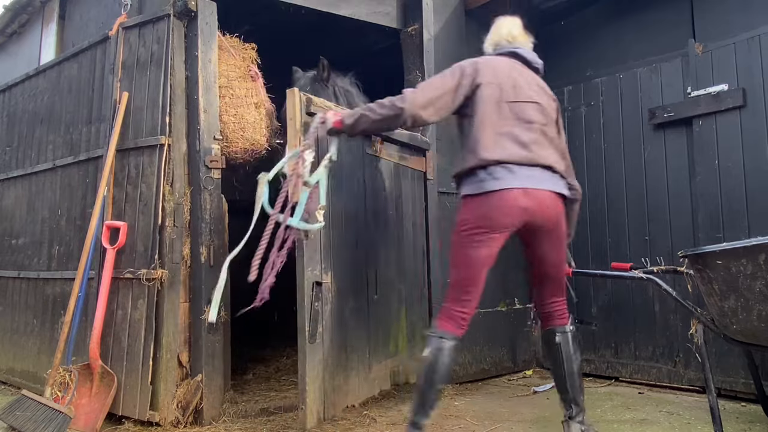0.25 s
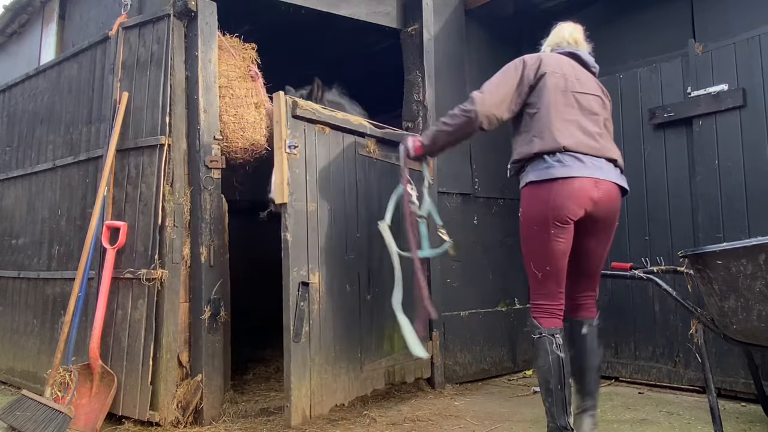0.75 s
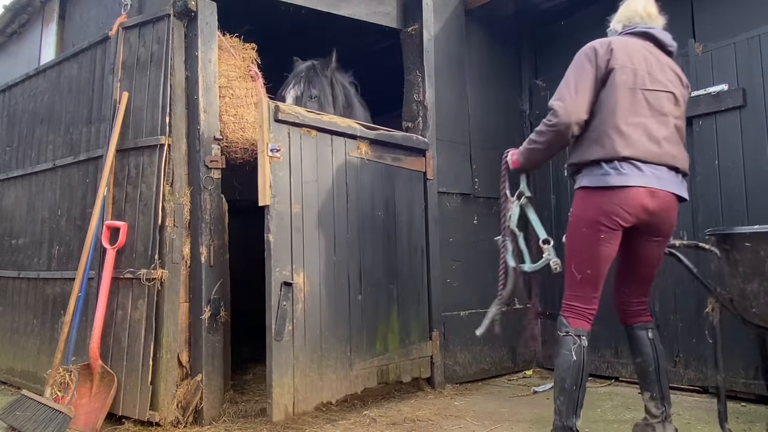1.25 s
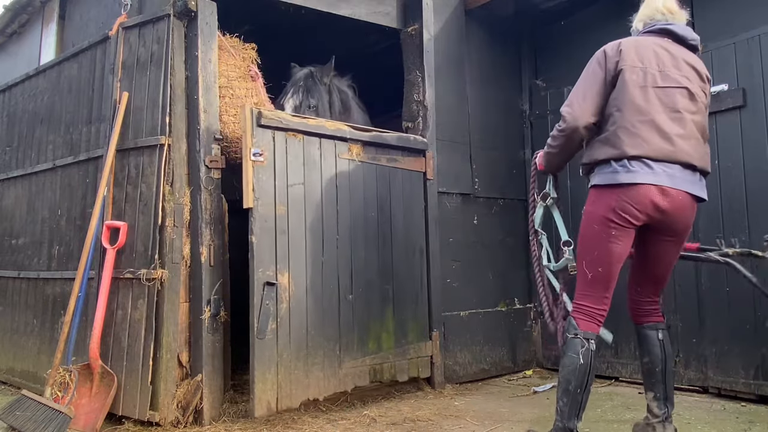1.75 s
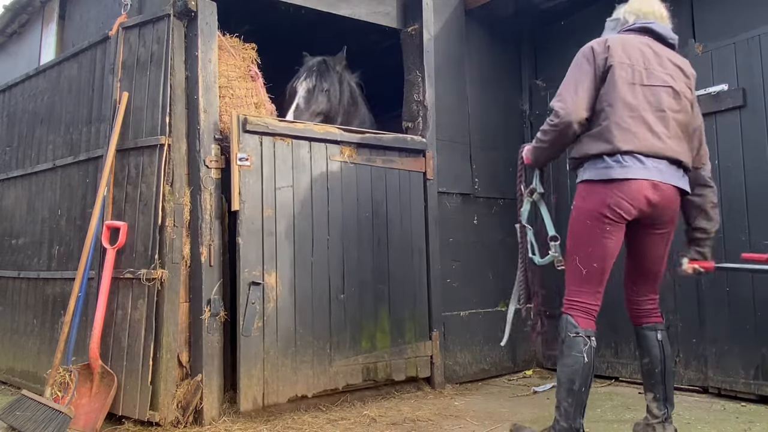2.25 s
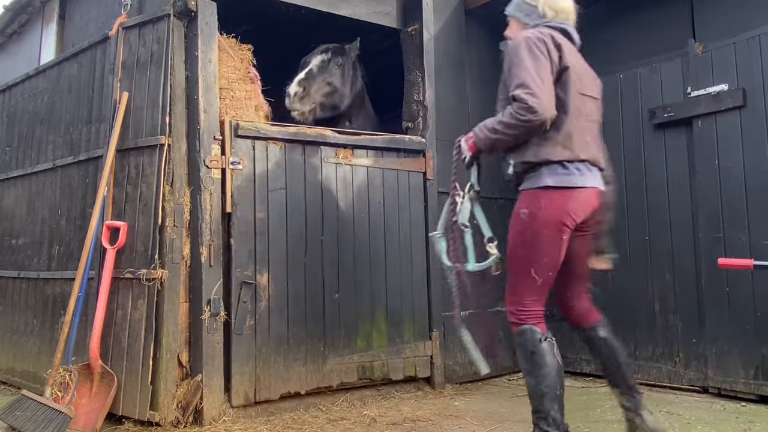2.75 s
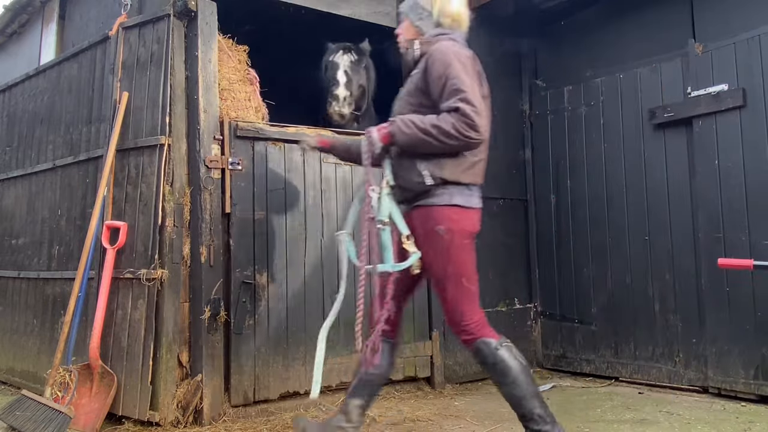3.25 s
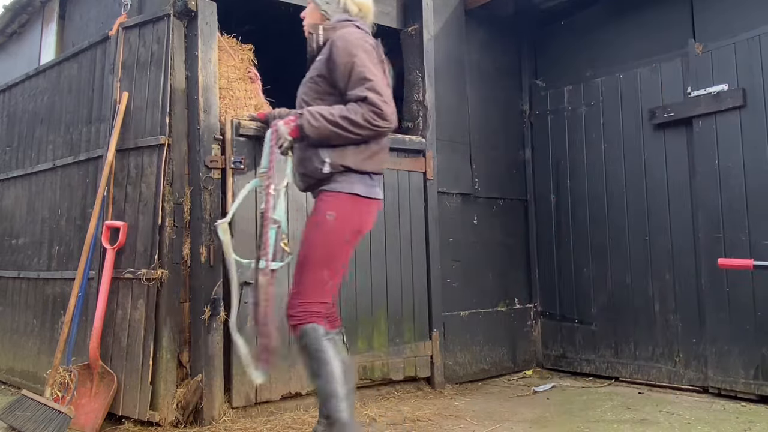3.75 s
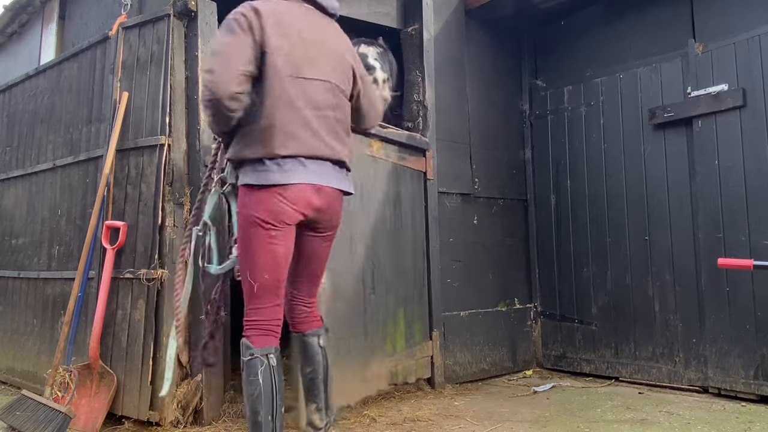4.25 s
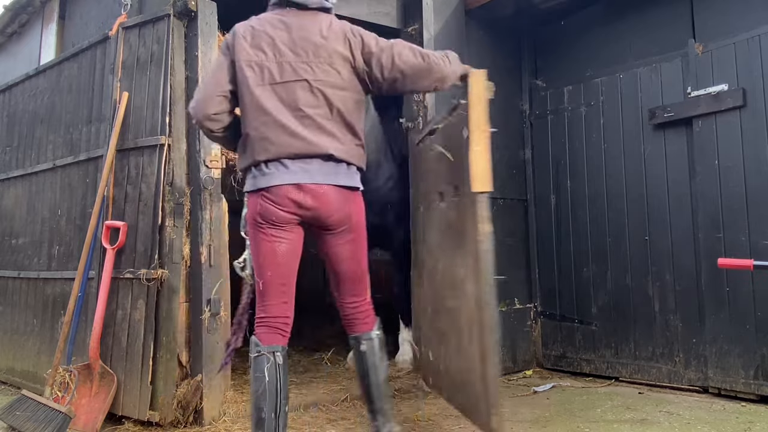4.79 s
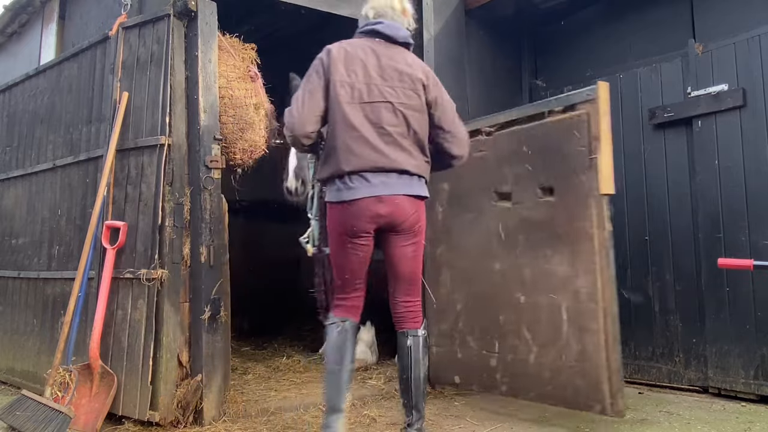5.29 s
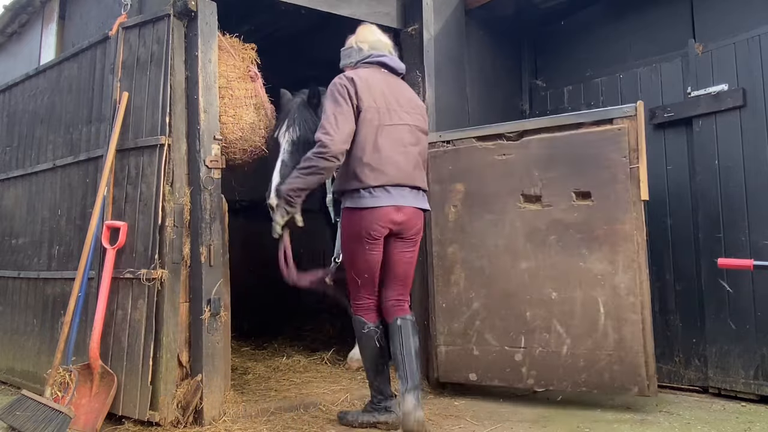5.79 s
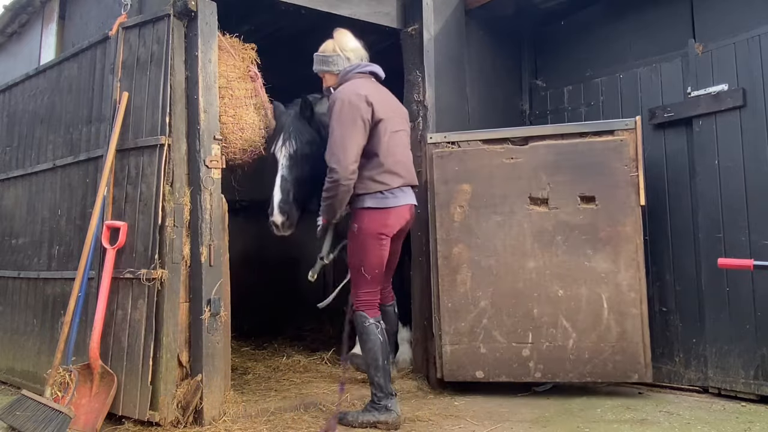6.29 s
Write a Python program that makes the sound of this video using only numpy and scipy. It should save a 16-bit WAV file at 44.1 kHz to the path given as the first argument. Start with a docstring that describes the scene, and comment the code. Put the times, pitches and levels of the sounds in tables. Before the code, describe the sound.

A small boarded stable yard, close and only briefly reverberant, captured in wide stereo by a phone. A low rumble, soft hiss and distant traffic lie underneath, with faint, thin bird whistles and falling chirps. From 0.1 to 1.1 s boots thump dully and scuff on gritty concrete, crunchiest around 0.5 s, where stones crack. Small metal clicks come at 1.4-1.8 s. At 2.3 s a heavy wooden door thuds hollowly against its frame, by far the loudest event, knocking again at 2.5 and 2.6 s as boards clatter and an iron bolt rattles, dying by about 3 s. A soft step and clip clicks follow at 3.3-3.5 s. At 3.74 s the rumble drops abruptly and keeps ebbing. At 4.4 s wood drags in a short, growing scrape; from 4.7 s a faint dry hinge rub fades. From 5.6 to 6.4 s webbing rustles while steel clips snap crisply and ring high.

```python
"""Boots thump and scuff on gritty concrete and halter clips click over a low rumble, traffic and a bird.
At 2.3 s a wooden stable door thuds against its frame and judders: its boards flex and its bolt rattles.
At 3.7 s the rumble drops abruptly, then ebbs; from 4.4 s the door drags out of its frame and its hinges rub.
Last, webbing rustles and steel clips ring. Solid bodies are sums of decaying modes, friction is shaped noise,
boarded walls add a diffuse tail, and a phone's two close ports receive it all."""
import sys
import numpy as np
from scipy import signal
from scipy.fft import rfft, irfft
from scipy.io import wavfile
from scipy.ndimage import uniform_filter1d

SR = 44100
rng = np.random.default_rng(int(sys.argv[2]) if len(sys.argv) > 2 else 0)


def put_to_file(sound):
    """Save the sound as 16-bit audio at rate SR, in the file named by the first command-line argument."""
    columns = np.atleast_2d(sound).T  # one column per channel
    safe = np.clip(columns, -1, 1)
    whole_steps = np.round(safe * 32767)
    wavfile.write(sys.argv[1], SR, whole_steps.astype(np.int16))


N = 287973  # samples

# Levels in tables are relative to each source's later gains. Density is per Hz.

# Door meets frame: (time [s], body drive [dB], knock drive [dB], board clack drive [dB], rattle drive [dB])
DOOR_CONTACTS = [(2.290, -17.5, -26, -47.5, -44), (2.304, -23.5, -23.5, -40, -49),
                 (2.343, -17.5, -29, -41.5, -53.5), (2.387, -37, -47, -67, -52),
                 (2.418, -36.5, -47.5, -51, -79), (2.476, -58, -57, -57, -52),
                 (2.490, -17.5, -25, -45.5, -54), (2.534, -30.5, -43, -50, -57.5),
                 (2.578, -20, -31, -49, -60), (2.620, -16.5, -35.5, -46, -59),
                 (2.674, -28.5, -41.5, -68, -72), (2.757, -31.5, -50.5, -63, -74),
                 (2.836, -40, -65, -65, -70)]
# Modes of the boarded door: (frequency [Hz], level [dB], decay time T60 [s])
DOOR_MODES = [(146.5, -12, 0.21), (163.4, -10, 0.26), (195.1, -8.5, 0.15), (247.2, -16.5, 0.29),
              (275.3, -17, 0.31), (353, -11, 0.16), (403, 0, 0.154), (427.7, -6.5, 0.2), (474, -15, 0.25),
              (541.5, -10, 0.16), (675, -17, 0.53), (776, -20, 0.28), (910, -19.5, 0.21), (914, -19, 0.55),
              (965.5, -13, 0.43), (1297, -22, 0.25), (1672, -18, 0.18), (1720, -16, 0.22),
              (1865, -11.5, 0.27), (2094, -22, 0.215), (2180, -17.5, 0.18)]
# Lowest bending mode of the whole leaf:
# (time [s], level [dB], frequency [Hz], rise constant [s], decay time T60 [s])
LEAF_BOOMS = [(2.307, -12, 113.4, 0.0098, 0.1), (2.345, -16.5, 113, 0.01, 0.097),
              (2.399, -30, 126, 0.0136, 0.17), (2.496, -18, 125, 0.0076, 0.043),
              (2.524, -22, 125.6, 0.0084, 0.091), (2.584, -27, 126, .012, 0.092),
              (2.625, -20, 109.4, 0.0054, 0.39), (2.724, -26.5, 115.8, 0.026, 0.38)]
# Loose boards clattering after each knock: (frequency [Hz], density [dB])
CLATTER_SPECTRUM = [(250, -18.5), (420, 7.5), (650, -4), (950, -3), (1400, -21.5), (2600, -18.5),
                    (6000, -31)]
# Splintery contact noise: (frequency [Hz], density [dB])
CRACK_SPECTRUM = [(200, 4.5), (600, 8.5), (1000, -1.5), (1400, 5), (1950, 7), (2800, 8), (5000, -5),
                  (7500, 8.5), (11700, 3.5), (13000, -17.5), (15500, -8)]
# Modes of the iron bolt: (frequency [Hz], level [dB], decay time T60 [s])
BOLT_MODES = [(2920, -13, 0.1613), (4460, -6, 0.25), (4700, -8.5, 0.25), (4730, -5.5, 0.7),
              (4960, -10, 0.3), (5140, -11, 0.23)]
# Bolt thrown against its keeper: (time [s], level [dB])
BOLT_CONTACTS = [(2.299, -52), (2.345, -55), (2.475, -52.5), (2.537, -53), (2.620, -58.5)]
# Board edges clacking together: (frequency [Hz], density [dB])
CLACK_SPECTRUM = [(600, -9), (1100, -10), (1450, 2), (2000, 3), (2500, -10.5), (3000, -5.5), (4200, -14),
                  (7000, -32)]
# Door edge dragging out of its frame: (frequency [Hz], density [dB])
DRAG_SPECTRUM = [(200, -4), (600, -17), (1200, -3), (2300, 9), (2600, 2.5), (2920, 8), (4000, -1.5),
                 (5500, -10.5), (7200, -4.5), (8500, -15), (10000, -7.5), (11800, -11), (13000, -26)]
# Hinge friction: (frequency [Hz], density [dB])
HINGE_SPECTRUM = [(1200, -20), (2250, 3), (2600, -15), (2920, 2.5), (3300, 4), (3750, 1.5), (4600, 0),
                  (5400, -6), (6500, -7), (8000, -17)]
# Halter clips knocking together:
# (time [s], click level [dB], click tilt [dB per octave], buckle level [dB], hook level [dB])
CLIP_CONTACTS = [(0.291, -73, 0, -76, -86), (1.411, -54.5, -13, -86, -90), (1.62, -55, 0, -61, -76),
                 (1.765, -69, 0, -76.5, -88), (1.824, -52.5, -12.5, -90, -80), (3.462, -45, -3, -75, -75),
                 (3.469, -45, -8.5, -75, -80), (3.613, -73, 2, -73.5, -82), (5.702, -48.5, -3.5, -80, -71),
                 (5.72, -54, -2, -81, -80), (5.766, -59, 2, -72, -85), (5.776, -42, 5, -85, -79),
                 (5.817, -38.5, 1, -90, -65), (5.936, -50.5, 1, -88, -77), (6.083, -49, 4, -90, -86),
                 (6.121, -38, 4, -88, -79), (6.213, -57, -6.5, -80.5, -76.5), (6.382, -49, 8, -74.5, -76)]
# Modes of a steel buckle: (frequency [Hz], level [dB], decay time T60 [s])
BUCKLE_MODES = [(3900, -24, 0.46), (6860, -2.5, 0.26), (8100, -16, 0.32), (9550, -0.5, 0.15),
                (11400, 1, 0.16), (11600, 4, 0.15), (14560, -18.5, .14), (15700, -11, .12)]
# Modes of the snap hook: (frequency [Hz], level [dB], decay time T60 [s])
HOOK_MODES = [(9700, -6, 0.085), (10850, -22, .12), (12170, -14, .08), (15290, 6, 0.059)]
# Snap of metal on metal, also the rustle: (frequency [Hz], density [dB])
SNAP_SPECTRUM = [(1000, -52), (3000, -23.5), (5000, -16), (6000, -7.5), (8000, -9), (10000, 3), (11800, -1),
                 (13200, -34), (15500, -2.5)]
# Soles and cloth scraping: (peak time [s], length [s], level [dB], treble tilt [dB per octave])
SCRAPES = [(0.152, 0.047, -58.5, -2), (0.409, 0.033, -49.5, 0), (0.448, 0.059, -44.5, -3.5),
           (0.497, 0.11, -48.5, 0.5), (0.536, 0.065, -38, -2), (0.563, 0.03, -49, -2.5),
           (0.602, 0.066, -43.5, -1.5), (0.696, 0.051, -46.5, -3), (0.861, 0.095, -54, -2),
           (0.976, 0.032, -47, 3), (1.048, 0.017, -49, 3.5), (1.068, 0.02, -50.5, 0),
           (3.116, 0.013, -52, -0.5), (3.45, 0.031, -56.5, 0.5), (4.258, 0.054, -56.5, 2.5),
           (4.057, .025, -59, -3), (5.655, 0.092, -69, 4.5), (5.585, 0.014, -65, 1),
           (6.085, .011, -56.5, 2), (6.123, .011, -54.5, 2.5)]
# Grit under a sole: (frequency [Hz], density [dB])
GRIT_SPECTRUM = [(150, 4), (550, 2), (750, -8), (1000, 2.5), (1300, -1), (2600, -1.5), (4000, -2),
                 (5500, -2.5), (11500, -1), (13000, -28), (16000, -21)]
# Footfalls: (time [s], level [dB])
FOOTFALLS = [(0.145, -31.5), (0.424, -29.5), (0.442, -32.5), (0.611, -31.5), (0.693, -39.5), (1.029, -35),
             (3.32, -38)]
# Modes of a boot heel on concrete: (frequency [Hz], level [dB], decay time T60 [s])
HEEL_MODES = [(69.3, -12, 0.76), (105.5, 6, 0.11), (145, -0.5, 0.14), (167, -7.5, 0.15), (216, -14.5, 0.19),
              (314, -5, 0.1), (433, 0.5, 0.038)]
# Bits of grit cracking under a sliding sole: (time [s], level [dB], frequency [Hz])
STONE_CRACKS = [(0.517, -28, 5340), (0.5272, -26, 4300), (0.534, -36, 3800), (0.5467, -27.5, 3300),
                (0.548, -36.5, 6000), (3.114, -45, 3970), (6.1222, -51, 4200)]
# Held bird whistles: (time [s], length [s], start frequency [Hz], level [dB], buzz [share of pitch])
HELD_WHISTLES = [(0, 0.065, 6930, -65, 0.017), (0, 0.28, 4950, -68, .02), (1.09, 0.19, 3530, -69, 0.0095),
                 (1.371, 0.2, 4870, -69, .06), (1.753, 0.045, 4190, -61, 0.008),
                 (3.48, 0.22, 8100, -70, 0.022), (3.689, 0.22, 8130, -65.5, 0.02),
                 (3.951, 0.21, 8210, -61.5, 0.024), (4.225, 0.07, 4330, -65.5, 0.065),
                 (4.255, .06, 3800, -57.5, 0.047), (4.486, 0.14, 4330, -70, 0.016),
                 (4.506, 0.096, 3600, -68.5, .02), (4.87, .09, 3310, -70, .025),
                 (4.938, 0.16, 3590, -79, .015)]
# Runs of falling slurs: (time [s], run length [s], top frequency [Hz], level [dB], buzz [share of pitch])
SLUR_RUNS = [(1.074, .05, 7800, -69, .03), (1.171, .05, 7800, -65, 0.043), (1.284, .05, 7750, -63.5, 0.036),
             (2.936, 0.045, 7570, -74, 0.013), (4.199, .05, 4540, -61, 0.072),
             (4.68, .05, 6750, -69.5, 0.045), (4.739, 0.13, 4470, -71, 0.042),
             (4.859, 0.4, 7480, -76, .018), (5.335, .05, 4230, -77, 0.026), (5.43, .05, 3480, -77, 0.023)]
# Low rumble: (frequency [Hz], density [dB])
RUMBLE_SPECTRUM = [(20, -16), (45, -2), (66, 7), (95, -4), (125, -4.5), (168, -6), (220, -11), (330, -16.5),
                   (600, -27.5), (1500, -64)]
# Far traffic and the hiss of the air: (time [s], traffic level [dB], hiss level [dB])
AIR_LEVELS = [(0, -59.5, -58), (.8, -57.5, -60), (3.6, -56, -62), (4.0, -61.5, -65.5), (4.6, -62.5, -68.5),
              (6.53, -62, -74.5)]
# Far traffic: (frequency [Hz], density [dB])
TRAFFIC_SPECTRUM = [(200, -26.5), (350, -10.5), (540, -24.5), (760, -7), (970, 5), (1080, 3), (1270, -6),
                    (1650, -3), (2000, -30), (4000, -38)]
# Hiss of the air: (frequency [Hz], density [dB])
HISS_SPECTRUM = [(300, -1.5), (1000, 10.5), (1800, 10), (2300, 6), (3200, -1.5), (5000, -6), (7500, -6),
                 (8700, -20), (10000, -7), (11900, -20.5), (12600, -48.5), (16000, -61)]
# The phone's widening of the image: (frequency [Hz], side gain [dB])
SIDE_GAIN = [(60, 21.5), (110, 14), (200, 12), (400, 12.5), (700, 15.5), (1200, 4.5), (2400, -2),
             (8000, -1)]

DOOR_LAG_MS, PORT_SPAN_MS = 0.187, 0.31
LATCH_LEAD_S = .0015  # the loose ironwork touches just before the wood
CLATTER_DB, CLATTER_RISE_S, CLATTER_T60_S = -17.5, 0.0087, 0.36  # level against the knock
CLATTER_SCATTER_DB = 5.5
CHOKE_S = 0.012  # each new slap damps the boom before it
CLACK_RISE_S, CLACK_T60_S = 0.0039, .11
DRAG_START_S, DRAG_END_S = 4.372, 4.462
DRAG_DB, DRAG_GROWTH_DB_PER_S, DRAG_ROUGH_DB = -50.5, 27, 0.5
CATCH_EVERY_S, CATCH_JITTER_S, CATCH_T60_S = .009, .002, 0.064
HINGE_S, HINGE_DB, HINGE_RISE_S, HINGE_T60_S, HINGE_ROUGH_DB = 4.67, -73, 0.011, 3.1, 3
RUSTLE_START_S, RUSTLE_END_S, RUSTLE_EDGE_S = 5.58, 6.4, 0.044
RUSTLE_DB, RUSTLE_PATCHY_DB = -74, 4.5
SCRAPE_RISE_SHARE, SCRAPE_FALL_SHARE = .36, 0.63  # time constants, as shares of a scrape's length
STONE_T60_S, STONE_SKIRT_DB_PER_OCT = 0.0078, 16
WHISTLE_SAG_OCT_PER_S = .2
SLUR_S, SLUR_EVERY_S, SLUR_FALL_OCT = 0.084, 0.12, 0.25
BIRD_DB, BIRD_WET_DB = -4, 2
RUMBLE_DB, RUMBLE_SAG_DB_PER_S, RUMBLE_STOP_S, RUMBLE_STOP_LENGTH_S = -48, -0.37, 3.74, 0.01
RUMBLE_DROP_DB, RUMBLE_EBB_DB, RUMBLE_EBB_S = -11, -23, 1.8
TOP_HZ = 15900


def door(swell_cycles=1.9, scatter_db=5.5):
    """Modal superposition: each contact excites the boards' modes, the low ones building up last."""
    t, wood = np.arange(SR) / SR, np.zeros(N)
    hz, mode_db, t60 = np.transpose(DOOR_MODES)[:, :, None]
    swell = (1 - np.exp(-(t * hz / swell_cycles) ** 2)) * fade(t, t60)
    swell = swell / swell.max(axis=1, keepdims=True)
    waves = undb(mode_db) * swell * np.sin(2 * np.pi * hz * t)
    mode_hz = hz[:, 0]
    for s, *force_db, _ in DOOR_CONTACTS:
        # body, knock and clack drives, joined over log frequency
        drive_db = np.interp(np.log(mode_hz), np.log([200, 400, 2000]), force_db)
        # high modes vary most from contact to contact
        drive_db += scatter_db * np.minimum(mode_hz / 1500, 1) * rng.standard_normal(len(hz))
        add(wood, s, undb(drive_db) @ waves)

    times, _, knock_db, _, rattle_db = np.transpose(DOOR_CONTACTS)
    clatter_envelope = strikes(times, knock_db, CLATTER_RISE_S, CLATTER_T60_S)
    clatter = undb(CLATTER_DB) * grains(CLATTER_SPECTRUM, CLATTER_SCATTER_DB) * clatter_envelope
    crack_envelope = strikes(times - LATCH_LEAD_S, rattle_db, 0.0008, 0.13)
    crack = undb(5.0) * grains(CRACK_SPECTRUM, scatter_db=4.0) * crack_envelope
    # the loose bolt chatters in its keeper as it rings
    bolt = ring(BOLT_MODES, *np.transpose(BOLT_CONTACTS)) * (1 + 0.33 * walk(450))
    body = ports(wood + clatter + bolt + crack, DOOR_LAG_MS)
    # the side wall throws the knock back towards the right port: (frequency [Hz], gain [dB])
    lean = shape([(170, 0.095), (380, 0.84), (800, 1.9), (2400, 0.33)])
    leaning = irfft(rfft(body) * np.array([1 / lean, lean]), N)
    return ports(boom(), DOOR_LAG_MS) + yard(leaning, wet_db=-7, t60=0.189)


def boom():
    """Damped resonance: the leaf's lowest bending mode swells after a slap until the next one chokes it."""
    t, out = np.arange(SR) / SR, np.zeros(N)
    ends = [row[0] for row in LEAF_BOOMS[1:]] + [np.inf]
    for (s, db, hz, rise_s, t60), end in zip(LEAF_BOOMS, ends):
        swell = (1 - np.exp(-(t / rise_s) ** 2)) * fade(t, t60)
        choke = np.exp(-(np.maximum(s + t - end, 0) / CHOKE_S) ** 2)
        add(out, s, undb(db) * swell / swell.max() * choke * np.sin(2 * np.pi * hz * t))
    return out


def boards():
    """Impact noise: loose boards clack together, with other chance resonances at every contact."""
    t, out = np.arange(SR) / SR, np.zeros(N)
    splinters = grains(CLACK_SPECTRUM, scatter_db=3.5)
    contact = (1 - np.exp(-t / CLACK_RISE_S)) * fade(t, CLACK_T60_S)
    for s, _, _, clack_db, _ in DOOR_CONTACTS:
        add(out, s, undb(clack_db) * contact * spot(splinters, width_hz=40, peaks_db=2.0))
    return yard(ports(out, lag_ms=0.1), wet_db=-2.5, t60=0.13)


def drag():
    """Stick-slip friction: wood catches on wood, harder and harder until the door comes free."""
    times = np.arange(DRAG_START_S, DRAG_END_S, CATCH_EVERY_S)
    late, size = rng.standard_normal((64, 2))[:len(times)].T
    catch_db = DRAG_DB + DRAG_GROWTH_DB_PER_S * (times - times[0]) + DRAG_ROUGH_DB * size
    catches = strikes(times + CATCH_JITTER_S * late, catch_db, 0.00032, CATCH_T60_S)
    scrape = grains(DRAG_SPECTRUM, scatter_db=0.5) * catches
    return yard(ports(scrape, DOOR_LAG_MS), wet_db=-4.5, t60=0.089)


def hinge():
    """Dry friction: iron rubs unevenly, hardest at the first pull and fading as the swing slows."""
    t = np.maximum(np.arange(N) / SR - HINGE_S, 0)
    speed = (1 - np.exp(-t / HINGE_RISE_S)) * fade(t, HINGE_T60_S)
    roughness = undb(HINGE_DB + HINGE_ROUGH_DB * walk(45))
    rub = grains(HINGE_SPECTRUM, scatter_db=5.0) * speed * roughness
    return yard(ports(rub, DOOR_LAG_MS), wet_db=0.5, t60=0.091)


def halter():
    """Impact and modal ringing: clips snap with a colour of their own and ring; sliding webbing rustles."""
    t, snaps = np.arange(SR) / SR, np.zeros(N)
    steel = grains(SNAP_SPECTRUM, scatter_db=-6.0)
    contact = (1 - np.exp(-t / .002)) * fade(t, 0.031)
    for s, click_db, tilt_db, _, _ in CLIP_CONTACTS:
        click = spot(steel, width_hz=230, peaks_db=1.0, tilt_db=tilt_db)
        add(snaps, s, undb(click_db + 2.5) * click * contact)
    times, _, _, buckle_db, hook_db = np.transpose(CLIP_CONTACTS)
    rings = undb(10.0) * (ring(BUCKLE_MODES, times, buckle_db) + ring(HOOK_MODES, times, hook_db))

    # webbing and rope slide as the halter is lifted to the horse
    sliding = curve([(RUSTLE_START_S - RUSTLE_EDGE_S, 0), (RUSTLE_START_S, 1),
                     (RUSTLE_END_S, 1), (RUSTLE_END_S + RUSTLE_EDGE_S, 0)])
    patches = undb(RUSTLE_DB + RUSTLE_PATCHY_DB * walk(32))
    rustle = grains(SNAP_SPECTRUM, scatter_db=4.0) * sliding * patches
    return yard(ports(snaps + rings + rustle, lag_ms=0.024), wet_db=-13.5, t60=0.14)


def boots():
    """Impact and granular friction: heels excite damped modes while soles grind grit."""
    t, out = np.arange(SR) / SR, grit_cracks()
    grit = grains(GRIT_SPECTRUM, scatter_db=3.0) * undb(2.4 * walk(200))
    for s, length, db, tilt_db in SCRAPES:
        rise, fall = SCRAPE_RISE_SHARE * length, SCRAPE_FALL_SHARE * length
        lead = min(s, 3 * rise)  # time from the onset to the peak
        pressure = np.exp(-np.where(t < lead, ((t - lead) / rise) ** 2, (t - lead) / fall))
        add(out, s - lead, undb(db) * pressure * spot(grit, width_hz=38, peaks_db=3.0, tilt_db=tilt_db))
    heel = sum(undb(db) * np.sin(2 * np.pi * hz * t) * fade(t, t60) for hz, db, t60 in HEEL_MODES)
    for s, db in FOOTFALLS:
        add(out, s, undb(db) * heel * (1 - np.exp(-t / 0.017)))
    return yard(ports(out, lag_ms=0.063), wet_db=-7.0, t60=0.079)


def grit_cracks():
    """Brittle fracture: single stones snap under the sole as noise bursts peaked at their own frequency."""
    t, out = np.arange(SR) / SR, np.zeros(N)
    for s, db, peak_hz in STONE_CRACKS:
        octaves_off = np.abs(np.log2(np.arange(1, SR // 2 + 2) / peak_hz))
        colour = undb(-STONE_SKIRT_DB_PER_OCT * octaves_off)
        burst = unit(irfft(rfft(rng.standard_normal(SR)) * colour, SR))
        add(out, s, undb(db) * burst * fade(t, STONE_T60_S))
    return out


def bird(warble=0.0104):
    """Frequency modulation: thin gliding tones waver and buzz, smeared by the distance."""
    out, waver, rasp, flutter = np.zeros(N), warble * walk(200), walk(900), undb(3.1 * walk(90))
    for s, length, start_hz, fall_oct, db, buzz in notes():
        u = np.linspace(0, 1, int(length * SR))
        now = max(int(s * SR), 0) + np.arange(len(u))
        hz = start_hz * 2 ** (-fall_oct * u) * (1 + waver[now] + buzz * rasp[now])
        envelope = np.sqrt(np.abs(np.sin(np.pi * u)))
        add(out, s, undb(db) * envelope * np.sin(2 * np.pi * np.cumsum(hz) / SR))
    return undb(BIRD_DB) * yard(ports(out * flutter, lag_ms=-0.039), wet_db=BIRD_WET_DB, t60=0.42)


def notes(pitch_scatter_oct=0.0142, scatter_db=1.5):
    """Pitch glides: note rows (time [s], length [s], start [Hz], fall [octaves], level [dB], buzz [share])."""
    rows = [(s, length, hz, WHISTLE_SAG_OCT_PER_S * length, db, buzz)
            for s, length, hz, db, buzz in HELD_WHISTLES]
    slurs = [(s + late, hz, db, buzz) for s, length, hz, db, buzz in SLUR_RUNS
             for late in np.arange(0, length, SLUR_EVERY_S)]
    # no two slurs are quite alike in pitch and level
    chance = rng.standard_normal((64, 2))
    for (s, hz, db, buzz), (a, b) in zip(slurs, chance):
        start_hz = hz * 2 ** (pitch_scatter_oct * a)
        rows.append((s, SLUR_S, start_hz, SLUR_FALL_OCT, db + scatter_db * b, buzz))
    return rows


def outdoors(traffic_pan_db=-2.0):
    """Diffuse fields: an uneven rumble, the hum of far tyres and a soft hiss as coloured noise."""
    rumble = field(RUMBLE_SPECTRUM) * undb(rumble_level() + 1.2 * walk(14))
    traffic = field(TRAFFIC_SPECTRUM) * undb(curve(AIR_LEVELS) - 5.5 + 1.5 * walk(7.8))
    hiss = field(HISS_SPECTRUM) * undb(curve(AIR_LEVELS, axis=2) + 0.42 * walk(6.7))
    pan = undb(traffic_pan_db * np.array([[.5], [-.5]]))  # left, right
    return rumble + traffic * pan + hiss


def rumble_level():
    """Level history in dB: a slow sag throughout, an abrupt drop, then an exponential ebb."""
    t = np.arange(N) / SR
    after = np.maximum(t - RUMBLE_STOP_S, 0)
    drop = RUMBLE_DROP_DB * np.minimum(after / RUMBLE_STOP_LENGTH_S, 1)
    ebb = RUMBLE_EBB_DB * (1 - np.exp(-after / RUMBLE_EBB_S))
    return RUMBLE_DB + RUMBLE_SAG_DB_PER_S * t + drop + ebb


def yard(x, wet_db, t60):
    """Reverberation: convolve the left port's sound with a decaying diffuse tail of the boarded walls."""
    t = np.arange(SR) / SR
    tail = field([(50, 0), (16000, 0)])[:, :SR] * fade(t, t60) * (1 - np.exp(-t / .012)) ** 2
    tail /= np.sqrt(np.sum(tail ** 2) / 2)
    return x + undb(wet_db) * signal.fftconvolve(x[:1], tail, axes=1)[:, :N]


def ports(x, lag_ms):
    """Arrival-time difference: a positive lag delays the left port against the right."""
    turn = np.exp(-1j * np.pi * bins() * lag_ms / 1000)
    return irfft(rfft(x) * np.array([turn, 1 / turn]), N)


def field(points):
    """Diffuse-field coherence: noise alike at both ports in the bass, unrelated in the treble."""
    mid, side = rfft(rng.standard_normal((2, N)))
    alike = np.sinc(2 * bins() * PORT_SPAN_MS / 1000)
    mid, side = mid * np.sqrt(1 + alike), side * np.sqrt(1 - alike)
    return unit(irfft(np.array([mid + side, mid - side]) * shape(points), N))


def ring(modes, times, dbs):
    """Modal ringing: damped metal modes, excited a little differently by each contact."""
    t, out = np.arange(SR // 2) / SR, np.zeros(N)
    waves = np.array([undb(db) * np.exp(2j * np.pi * hz * t) * fade(t, t60) for hz, db, t60 in modes])
    waves = waves * (1 - np.exp(-t / .001))
    for s, db in zip(times, dbs):
        size, turn = rng.standard_normal((2, len(modes)))
        excitation = undb(2 * size) * np.exp(2j * np.pi * turn)
        add(out, s, undb(db) * np.imag(excitation @ waves))
    return out


def strikes(times, dbs, rise_s, t60):
    """Energy addition: the envelope of a row of quick contacts sums their powers."""
    t, power = np.arange(SR // 2) / SR, np.zeros(N)
    for s, db in zip(times, dbs):
        add(power, s, (undb(db) * (1 - np.exp(-t / rise_s)) * fade(t, t60)) ** 2)
    return np.sqrt(power)


def grains(points, scatter_db):
    """Granular contact: dense tiny contacts of unequal size, coloured by a spectrum."""
    chance = np.minimum(rng.exponential(size=N // 16 + 1), 4)
    sizes = undb(scatter_db * np.repeat(chance, 16)[:N])  # held for 16 samples each
    return unit(irfft(rfft(rng.standard_normal(N) * sizes) * shape(points), N))


def spot(x, width_hz, peaks_db, tilt_db=0):
    """Local resonance: one second of contact noise through chance peaks of the spot touched."""
    hz = np.arange(SR // 2 + 1)
    peaks = unit(np.interp(hz / width_hz, np.arange(1000), rng.standard_normal(1000)))
    octaves = np.log2(np.maximum(hz, 300) / 3000)
    start = rng.integers(N - SR)
    colour = undb(peaks_db * peaks + tilt_db * octaves)
    return unit(irfft(rfft(x[start:start + SR]) * colour, SR))


def walk(rate):
    """Random modulation: a wander through about `rate` random points a second, scaled to rms 1."""
    k = max(int(SR / rate), 2)
    steps = np.repeat(rng.standard_normal(N // k + 1), k)
    return unit(uniform_filter1d(steps, k)[:N])


def fade(t, t60):
    """Exponential decay by 60 dB in t60 seconds."""
    return np.exp(-np.log(1000) * t / t60)


def shape(points):
    """Spectral weighting: gain from (frequency [Hz], level [dB]), joined over log frequency."""
    hz, db = np.transpose(points)
    return undb(np.interp(np.log(bins()), np.log(hz), db))


def bins():
    """Fourier frequencies in Hz of a full-length spectrum, at least 1 Hz."""
    return np.maximum(np.arange(N // 2 + 1) * SR / N, 1)


def curve(rows, axis=1):
    """Linear interpolation in time of one column of a table."""
    rows = np.array(rows)
    return np.interp(np.arange(N) / SR, rows[:, 0], rows[:, axis])


def undb(db):
    """Decibel law: level to amplitude gain."""
    return 10 ** (np.asarray(db) / 20)


def unit(x):
    """Normalisation to rms 1."""
    return x / np.sqrt(np.mean(x ** 2))


def add(out, s, x):
    """Superposition: mix x in at time s in seconds."""
    i = max(int(s * SR), 0)
    out[..., i:i + x.shape[-1]] += x[..., :max(N - i, 0)]


def scene():
    """Superposition of every source in the yard."""
    return door() + boards() + drag() + hinge() + halter() + boots() + bird() + outdoors()


def record(dry):
    """Mid-side widening between the phone's close ports, then filters cut the deepest bass and the top."""
    mid = (dry[0] + dry[1]) / 2
    side = irfft(rfft(dry[0] - dry[1]) * shape(SIDE_GAIN), N) / 2
    bass_cut = signal.butter(2, 32, "highpass", fs=SR, output="sos")
    top_cut = signal.ellip(8, .2, 70, TOP_HZ, fs=SR, output="sos")
    wide = signal.sosfilt(bass_cut, np.array([mid + side, mid - side]))
    return signal.sosfilt(top_cut, wide)


dry = scene()
out = record(dry)
put_to_file(out)
```